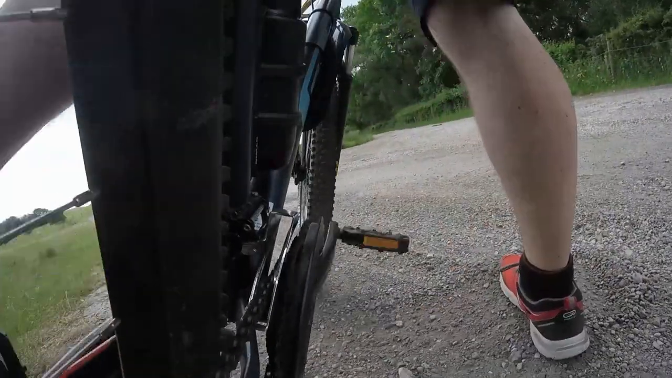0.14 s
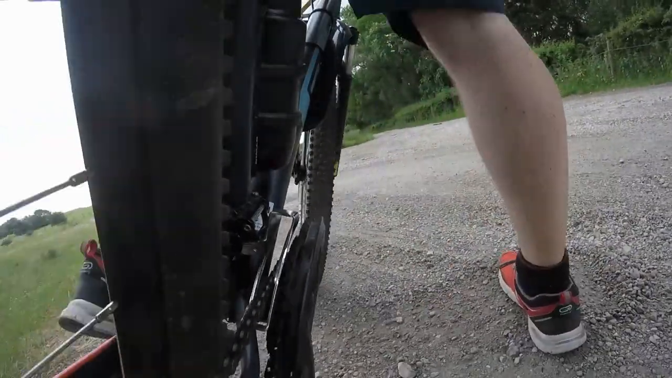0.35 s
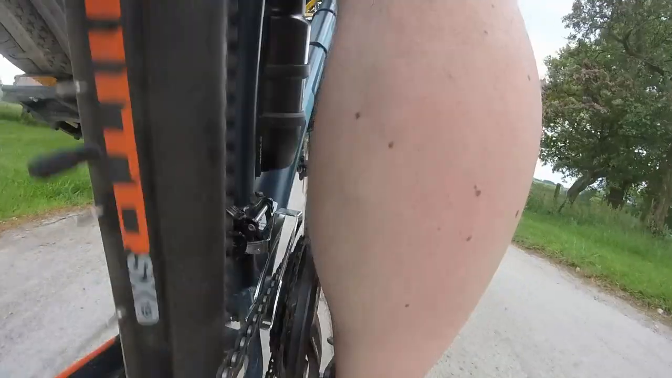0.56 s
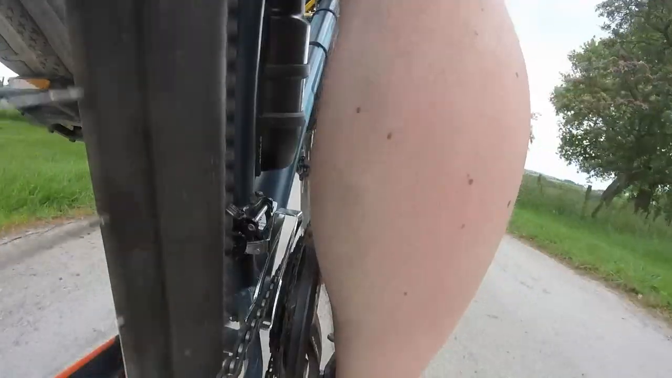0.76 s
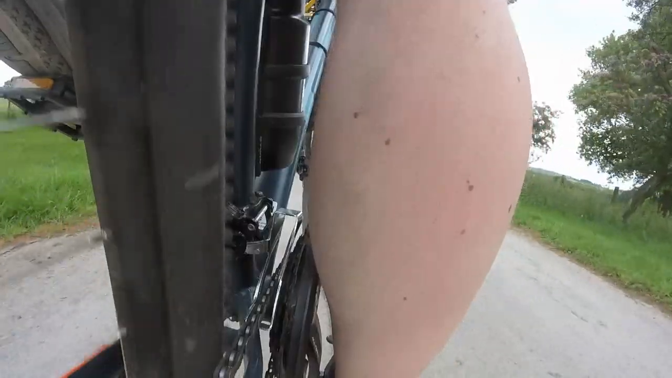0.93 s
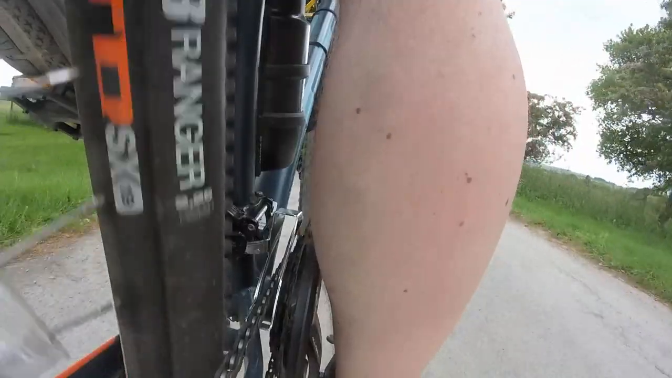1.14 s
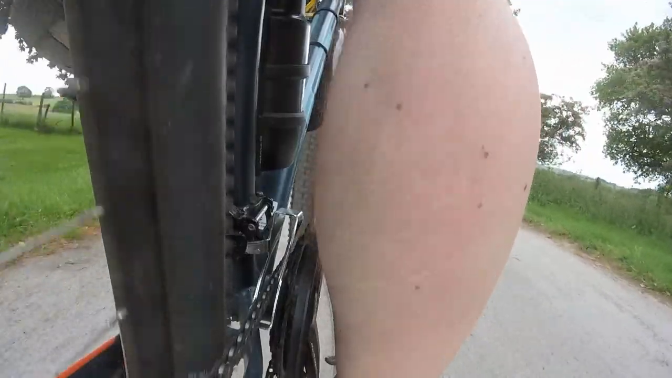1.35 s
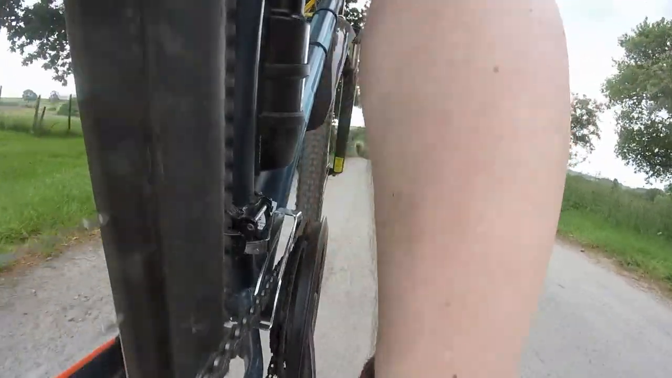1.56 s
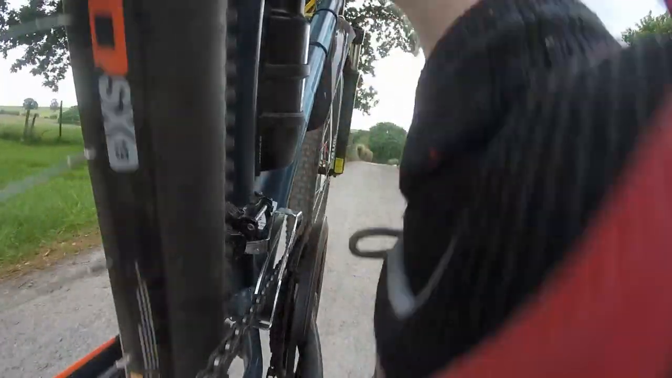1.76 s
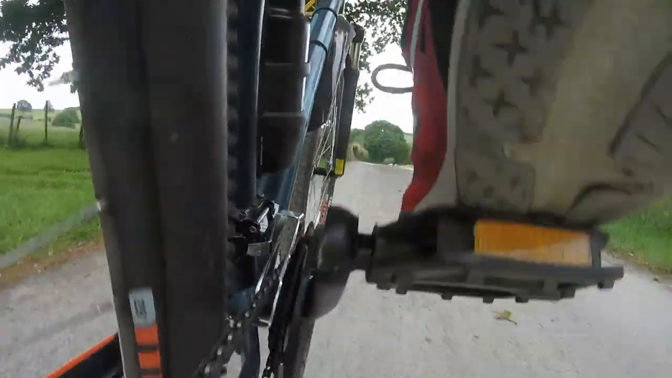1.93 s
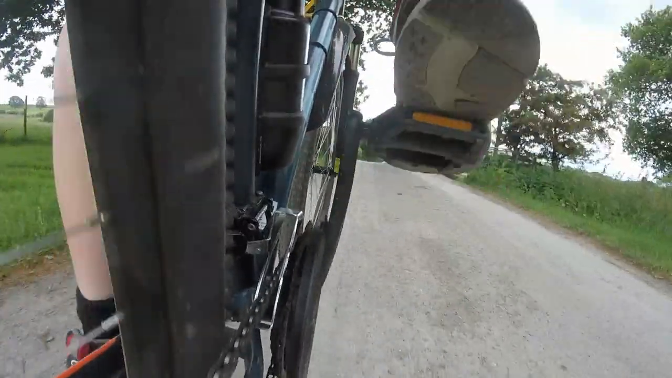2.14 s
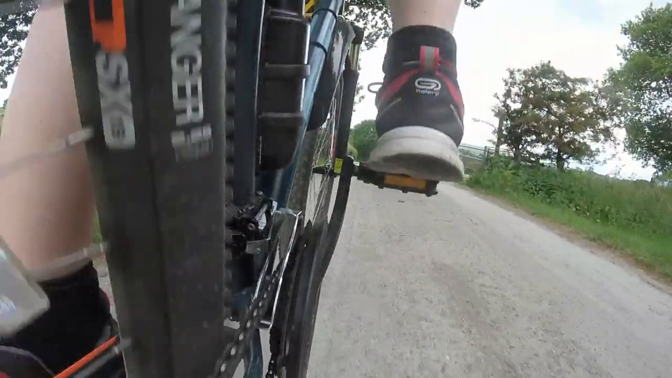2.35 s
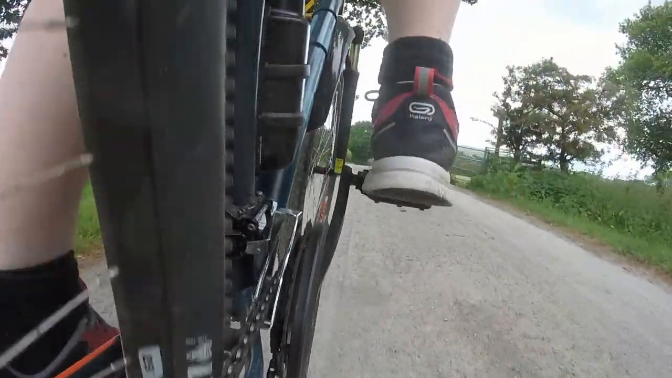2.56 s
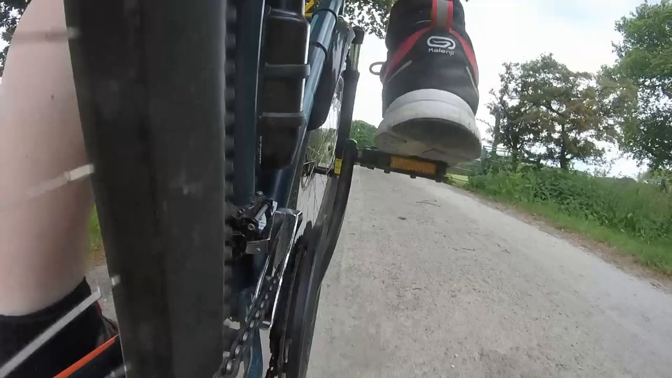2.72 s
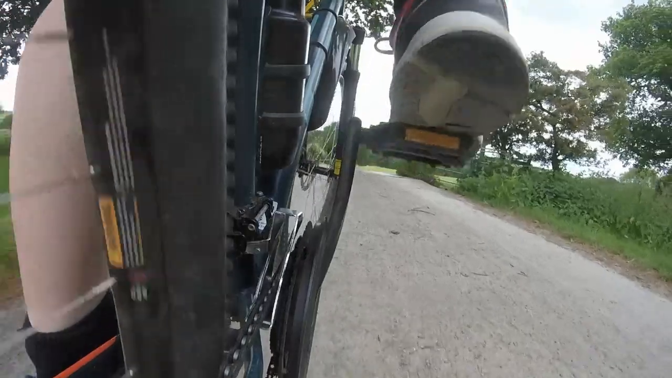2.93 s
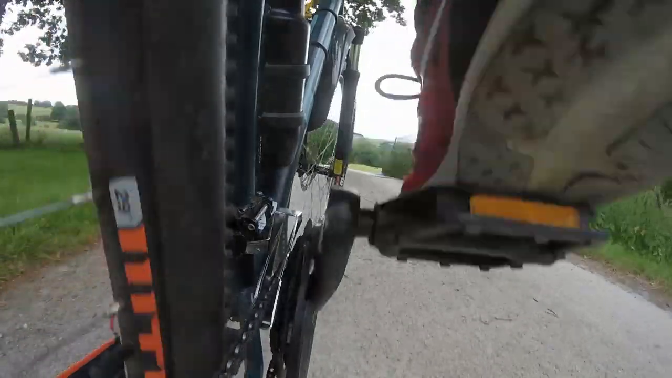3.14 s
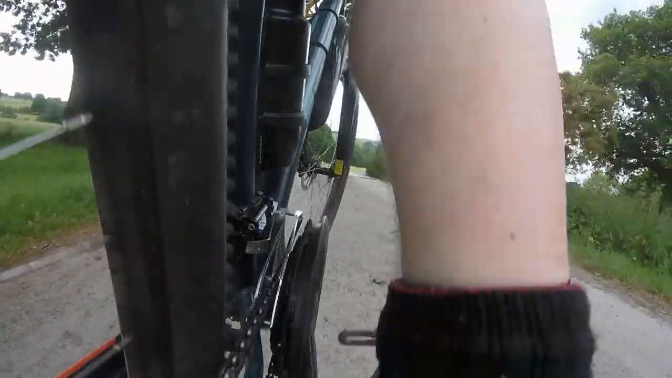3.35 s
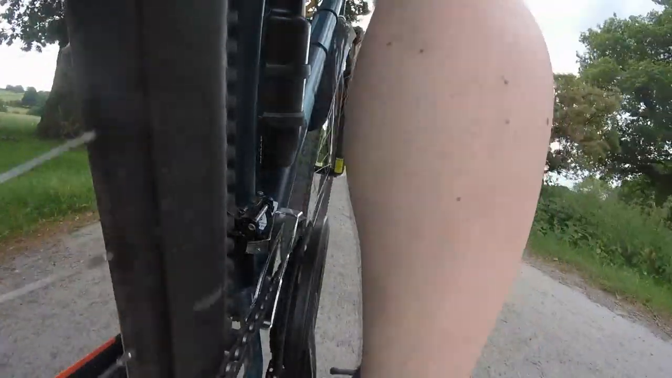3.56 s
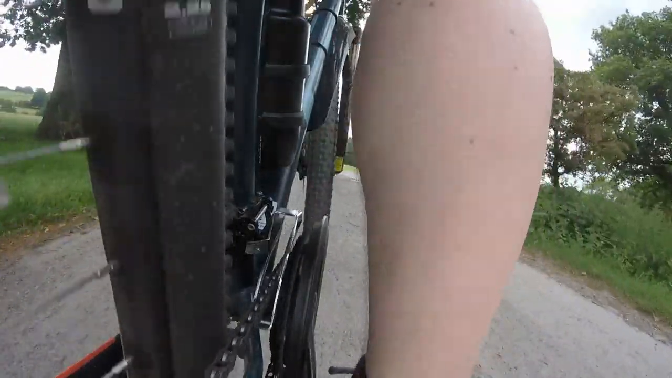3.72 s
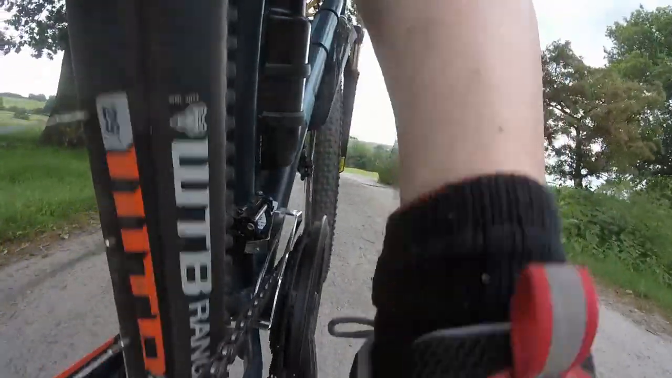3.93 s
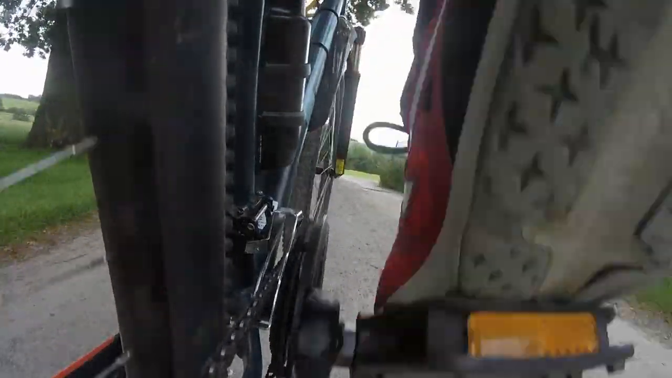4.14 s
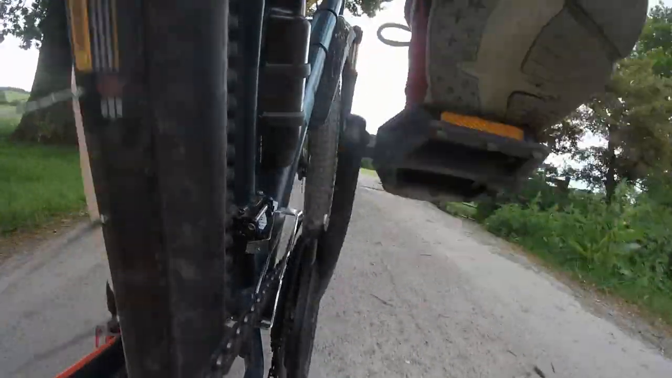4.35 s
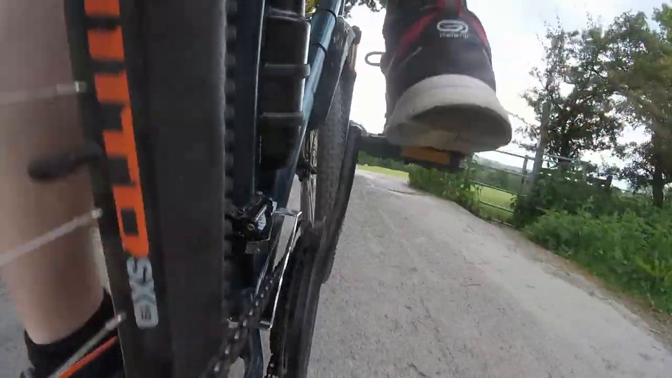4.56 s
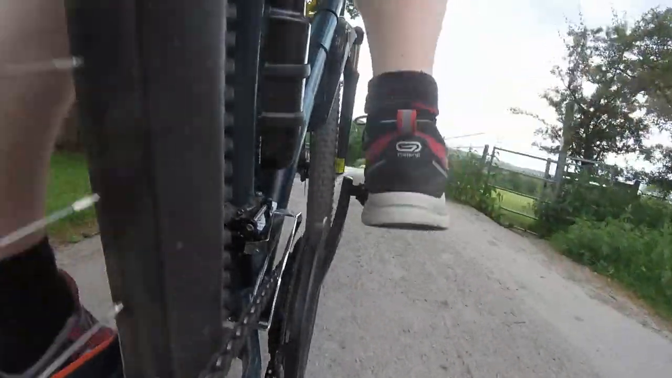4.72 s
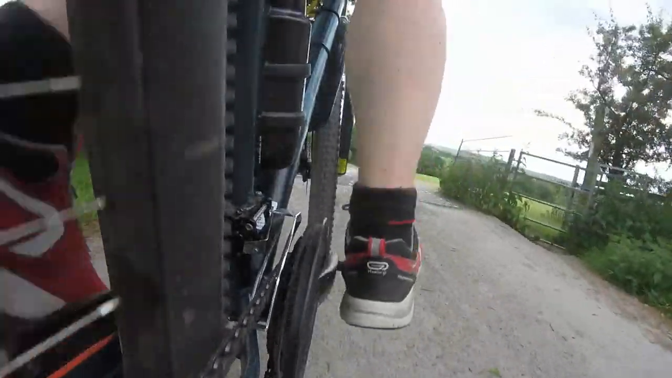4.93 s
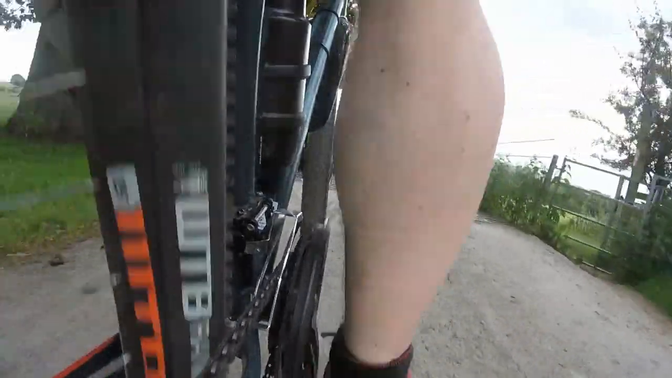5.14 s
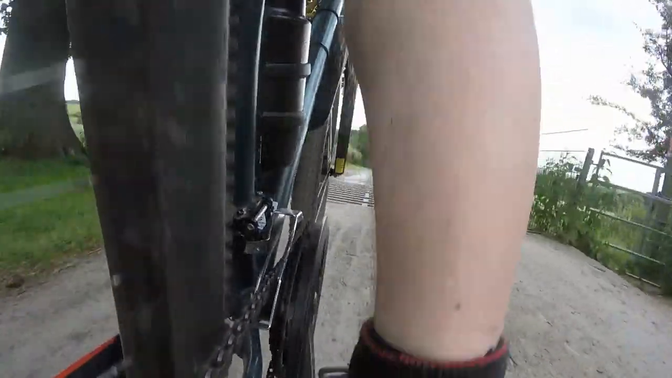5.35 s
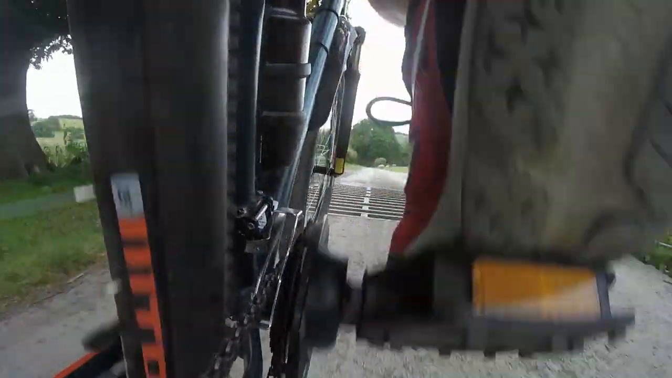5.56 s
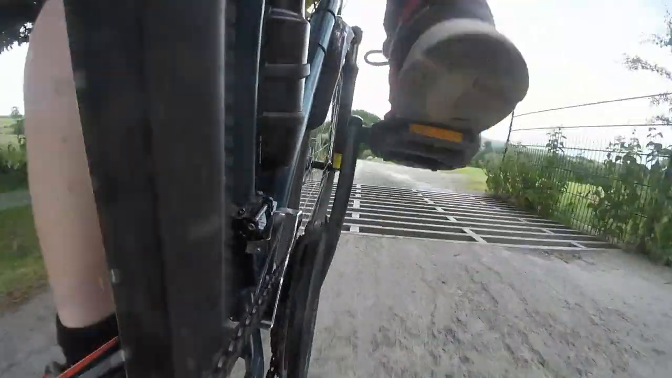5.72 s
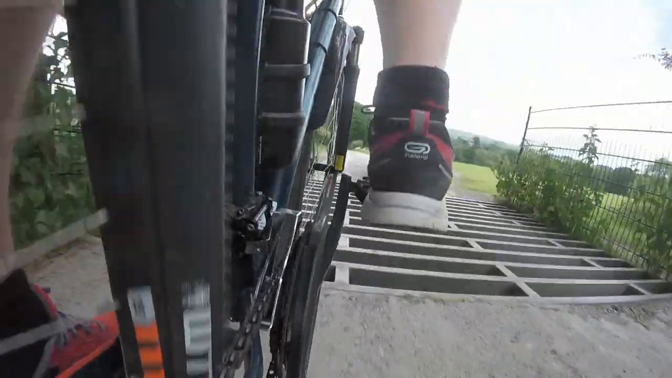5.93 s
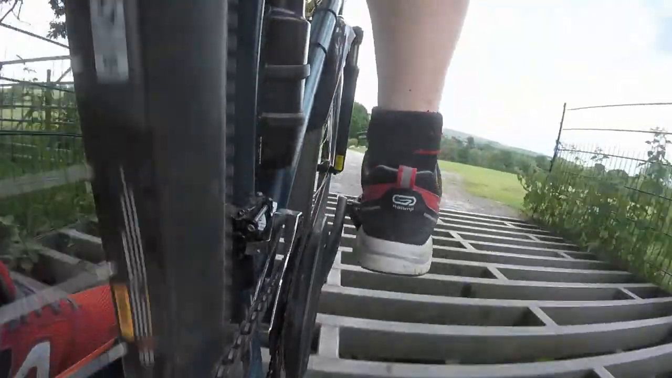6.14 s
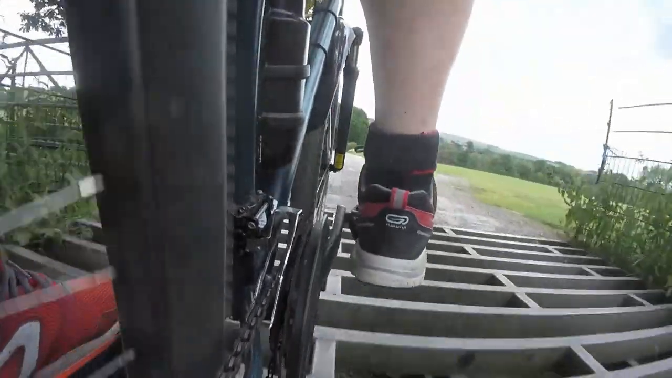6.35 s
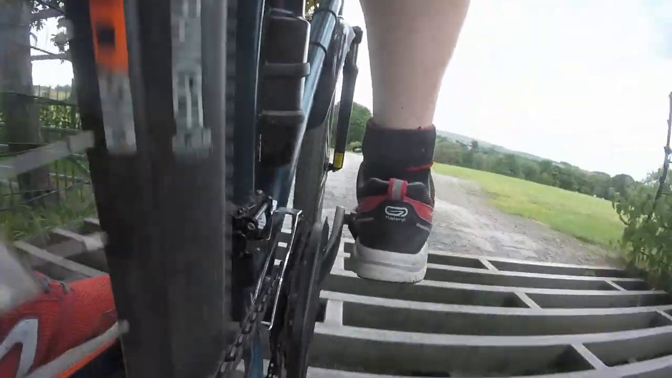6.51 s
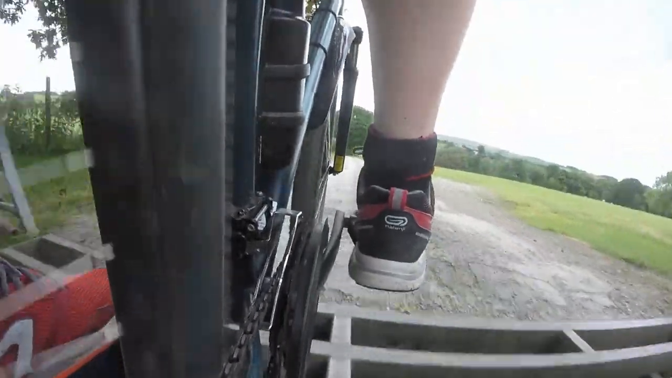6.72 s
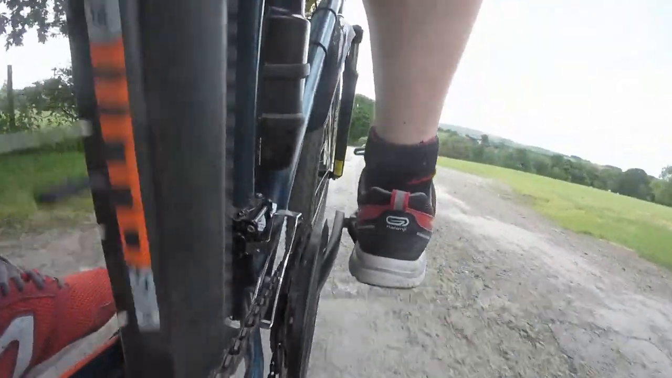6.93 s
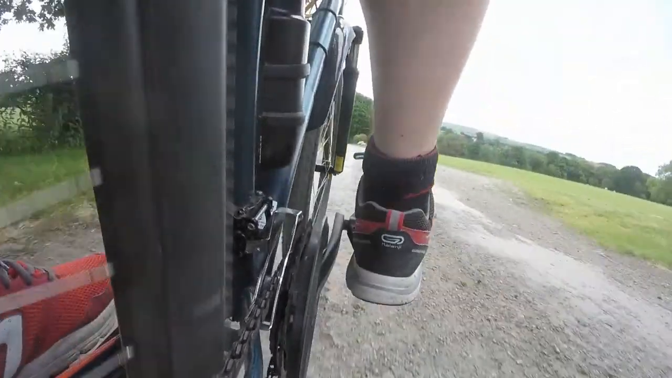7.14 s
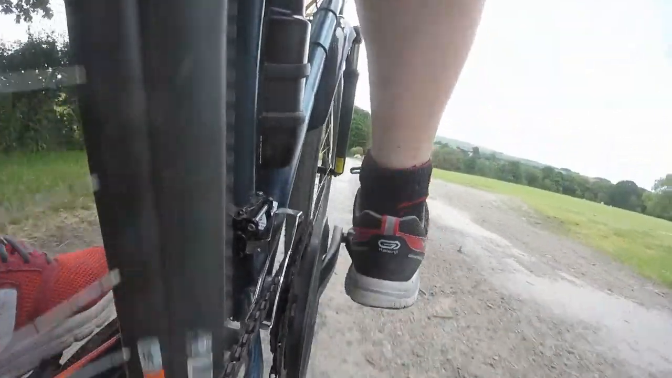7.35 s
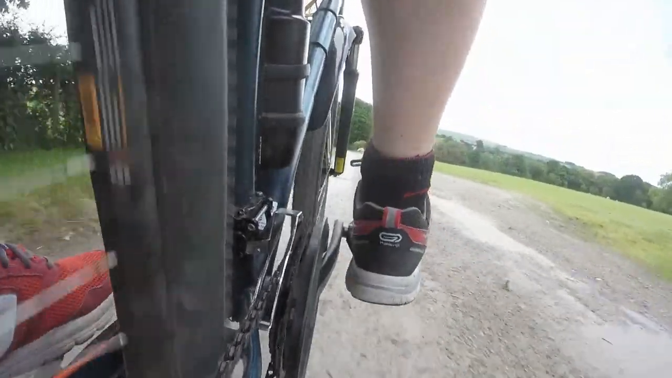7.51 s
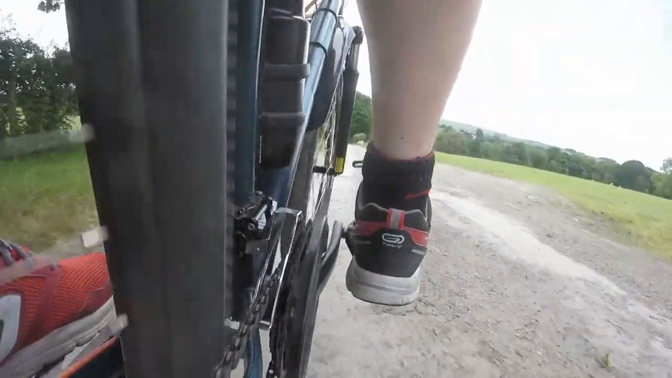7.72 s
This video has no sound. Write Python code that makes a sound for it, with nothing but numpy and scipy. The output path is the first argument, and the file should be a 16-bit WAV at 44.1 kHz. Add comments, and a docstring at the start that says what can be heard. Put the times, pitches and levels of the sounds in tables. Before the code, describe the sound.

After a few light knocks, bicycle tyres start humming and crackling over gravel outdoors, while air and bumps rumble the microphone mounted on the bike. Two spells of freewheel ticking are each followed by gear shifts that clunk and ring the frame. The ride then grows rougher and louder, with a cattle grid shaking the frame and the chain slapping and jangling to the end.

```python
"""A gravel path, heard from low on the frame of a mountain bike as it sets off.
The tyres hum as their tread drums the ground, and stones crunch under them. Freewheel pawls tick,
and the gears shift with clunks that ring the frame and a run of chain clicks. Near the end the bike
crosses a cattle grid: the frame drums and the slack chain rattles on over rough ground.
Underneath, air and uneven ground rock the microphone mount into a low rumble."""
import sys
import numpy as np
from scipy import signal
from scipy.io import wavfile

SR = 44100
rng = np.random.default_rng(int(sys.argv[2]) if len(sys.argv) > 2 else 0)


def int16_out(signal):
    """Quantize to a 16-bit WAV file."""
    q = np.round(np.clip(np.atleast_2d(signal).T, -1, 1) * 32767)
    wavfile.write(sys.argv[1], SR, q.astype(np.int16))


N = 343098
TIME = np.arange(N) / SR


# how hard the ground works the tyres: (time [s], hum level [dB], frame shaking [dB])
GROUND = [(0.33, -76, -77.5), (0.62, -57.5, -67.5), (1.3, -59.5, -70), (2.1, -59.5, -64),
          (2.75, -57.5, -69), (3.1, -59, -68), (3.87, -65, -71.5), (4.2, -58, -62.5), (4.65, -60, -63.5),
          (5.25, -47.5, -53), (5.47, -59, -58), (5.75, -49, -52), (5.9, -53.5, -58.5), (6.05, -53, -58),
          (6.09, -47, -54), (6.52, -42, -52), (6.95, -43, -51.5), (7.35, -49.5, -57), (7.78, -49.5, -55)]
# ruts and the grid's edge squash the tyres, which drum harder: (centre [s], half length [s], level [dB])
RUTS = [(0.71, 0.018, -61), (2.06, 0.042, -52), (3.97, 0.019, -52), (4.79, 0.017, -48.5),
        (5.09, 0.019, -45.5), (5.3, 0.039, -47), (6.1, 0.038, -44.5), (6.5, 0.04, -38.5)]
# the loaded chain grinds and shakes the frame: (centre [s], half length [s], level [dB])
CHAIN_GRINDS = [(0.38, 0.046, -62.5), (1.75, 0.16, -60), (3.5, 0.14, -58.5)]
# low hum of the casing: (frequency [Hz], level [dB])
TYRE_EQ = [(70, -27), (130, -5.5), (175, -1), (205, 2), (250, -3), (320, -4.5), (420, -15), (700, -20),
           (1600, -82)]
# hollow midrange of the shaken frame: (frequency [Hz], level [dB])
FRAME_EQ = [(200, -24.5), (400, 2), (520, -2.5), (690, 5), (770, -1.5), (860, 4), (1000, 3.5), (1110, -6.5),
            (1250, 0.5), (1450, -19), (1630, -8.5), (1900, -35.5), (4000, -48.5)]

def tyres(hum_db=-.5, rut_to_frame_db=-12.5, lumpy_db=2, uneven_db=1.5):
    """Tread blocks patter on the ground, drumming the casing; they and the chain shake the frame."""
    lumps = amp(lumpy_db * wander(per_s=60))
    patter = impacts(per_s=900, spread_db=2) * lumps * amp(uneven_db * wander(per_s=18))
    hum = evened(colour(patter, TYRE_EQ))
    shaking = evened(colour(impacts(per_s=1400, spread_db=3) * lumps, FRAME_EQ))
    ruts = swells(RUTS)
    hum_gain = np.hypot(follow(GROUND, column=1), ruts)
    ground_force = np.hypot(follow(GROUND, column=2), amp(rut_to_frame_db) * ruts)
    frame_gain = np.hypot(ground_force, swells(CHAIN_GRINDS))
    return amp(hum_db) * hum_gain * hum + frame_gain * shaking


# patches of looser gravel: (centre [s], half length [s], level [dB])
LOOSE_PATCHES = [(0.78, 0.059, -74.5), (2.05, 0.057, -71.5), (3.57, 0.1, -74), (4.65, 0.059, -71),
                 (5.27, 0.08, -66), (6.49, 0.036, -59.5), (6.89, 0.023, -58), (7.56, 0.07, -58.5)]
# featured stone snaps: (time [s], level [dB])
STONE_SNAPS = [(0.5957, -55.5), (0.7237, -59), (1.0692, -60.5), (1.2008, -58.5), (1.3508, -58),
               (1.428, -60), (4.159, -57), (4.258, -57), (4.339, -57), (4.6558, -50.5), (4.8359, -54.5),
               (4.9263, -50), (5.103, -54.5), (5.197, -47.5), (6.009, -53)]
# crunch of stones: (frequency [Hz], level [dB])
GRAVEL_EQ = [(500, -27.5), (1200, -1), (1800, -1.5), (2150, 0), (2700, -3), (3450, 1.5), (4100, -9),
             (4600, -8.5), (5600, -15.5), (7000, -12), (8800, -12.5), (11000, -24), (13000, -29),
             (16000, -10.5)]
# sharp grit spitting from the tread: (frequency [Hz], level [dB])
GRIT_EQ = [(1500, -18), (3300, 3.5), (5400, -4.5), (7000, 0), (8800, -13), (11500, -5.5), (13500, -17),
           (16000, -31)]

def gravel(dust_db=-5, stones_db=-1, grit_db=-9, snaps_db=4, clump_db=3):
    """Fine dust hisses under the tyres, stones crack and sharp grit spits."""
    t = np.arange(512) / SR
    clumps = amp(clump_db * wander(per_s=30))
    stones = impacts(per_s=600, spread_db=5) * clumps
    grit = impacts(per_s=160, spread_db=4.5) * clumps
    crunch = amp(dust_db) * evened(colour(rng.standard_normal(N), GRAVEL_EQ))
    crunch += amp(stones_db) * evened(colour(stones, GRAVEL_EQ))
    spit = rng.standard_normal(N) * signal.oaconvolve(abs(grit), np.exp(-t / 0.0016))[:N]
    crunch += amp(grit_db) * evened(colour(spit, GRIT_EQ))
    roughness = follow(GROUND, column=2) / amp(-70.5)  # frame shaking relative to smooth path
    bed_gain = amp(-81) * roughness ** 0.7
    out = np.hypot(bed_gain, swells(LOOSE_PATCHES)) * crunch
    strays = [(s, np.interp(s, TIME, bed_gain) * amp(15 + 2 * chance))  # these poke out of the bed
              for s, chance in scattered(start=0.66, end=6.0, per_s=3)]
    for s, gain in [(s, amp(db)) for s, db in STONE_SNAPS] + strays:
        add(out, s, gain * amp(snaps_db) * click(t, GRAVEL_EQ, rise=.0001, decay=.0032))
    # a low-pass at 12.5 kHz takes the high hiss off the gravel
    return signal.sosfilt(signal.butter(4, 12500, fs=SR, output='sos'), out)


# gear clunks, shoe and pedal knocks, stones:
# (time [s], level [dB], brightness [Hz], chatter length [s], ring time [factor])
KNOCKS = [(0.019, -61, 1420, 0.0067, 0.87), (0.149, -59, 710, 0.026, 0.63),
          (0.726, -55.5, 1060, 0.013, 1.5), (0.815, -58, 1950, 0.0041, 0.58),
          (1.628, -42.5, 885, 0.0071, 0.23), (1.631, -39.5, 1230, 0.0052, 0.7),
          (1.634, -33, 630, 0.0039, 0.76), (1.762, -52.5, 4700, 0.0012, 0.77),
          (1.7627, -46.5, 2160, 0.0033, 1.1), (1.763, -38.5, 1220, 0.012, 1.2),
          (1.836, -44.5, 2070, 0.00035, 0.75), (2.67, -48, 1250, 0.0047, 2.3),
          (3.02, -58.5, 2300, 0.0008, 0.91), (3.525, -58, 2660, 0.0025, 0.68),
          (3.617, -62, 1840, 0.0057, 0.26), (3.677, -59.5, 2430, 0.0015, 0.61),
          (3.943, -36, 774, 0.0051, 1), (3.946, -42.5, 1690, 0.0049, 2.3),
          (3.9486, -35.5, 1040, 0.0031, 0.41), (4.235, -53, 1990, 0.012, 0.33),
          (4.361, -51.5, 1470, 0.012, 0.81), (4.768, -54.5, 1860, .0025, 0.31),
          (4.79, -48, 1740, 0.011, .3), (4.904, -47.5, 915, 0.0084, 0.92), (5.063, -50.5, 810, .0077, 0.81),
          (5.227, -54.5, 1540, 0.0034, .7), (5.264, -50, 1200, 0.011, 0.97),
          (5.347, -50.5, 2510, 0.0049, 0.22), (5.625, -49.5, 905, 0.0054, 0.85),
          (5.711, -53.5, 825, .007, 0.79), (6.076, -46.5, 970, 0.015, .9), (6.48, -44, 1210, 0.013, 0.13),
          (6.856, -42, 804, .01, 0.81), (6.879, -42.5, 1690, 0.013, 0.22), (6.911, -44, 674, 0.0046, 1),
          (7.041, -48, 740, 0.0071, 1), (7.215, -55, 902, .003, 1.6), (7.463, -48.5, 1740, 0.027, 0.24),
          (7.505, -53, 2470, 0.0028, 0.42)]
# ring of the frame: (frequency [Hz], level [dB], t60 [s])
FRAME_MODES = [(210, 30, 0.16), (296, -39, 0.048), (412, -31, 0.027), (669, -6, 0.19), (721, 4, 0.081),
               (832.5, 3, 0.082), (960, 8, 0.04), (1151, 0.5, 0.054), (1220, 5, 0.029), (1588, -4.5, 0.026),
               (2096, -0.5, 0.012), (2300, -2.5, 0.007), (2930, -1.5, 0.018), (3250, -6.5, 0.031),
               (4570, -11, 0.037), (5120, -36, 0.02), (6980, -14, 0.027)]

def knocks(width=0.088, rebound=0.11, crack_db=-21, tail_db=-20, tail_t60=0.27):
    """A blow and its chatter ring the frame; harder contacts reach higher modes."""
    out, t = np.zeros(N), np.arange(8192) / SR
    for s, db, brightness, length, ring_factor in KNOCKS:
        modes = []
        for hz, level, t60 in FRAME_MODES:
            octaves = abs(np.log2(hz / brightness))
            rolloff_db = 6 * octaves ** 2 / (width + 0.17 * octaves)
            modes.append((hz, level - rolloff_db, t60 * ring_factor))
        chatter = rng.standard_normal(len(t)) * np.exp(-(t / length) ** 2)
        blow = rebound * chatter
        blow[0] += 1  # the first contact
        buzz = rng.standard_normal(len(t)) * amp(-60 * t / tail_t60)  # fittings buzz on after the blow
        blow += amp(tail_db) * buzz / np.linalg.norm(buzz)
        body = signal.fftconvolve(blow, ring(modes, t))[:len(t)]
        body /= np.std(body[t < max(.01, length)])  # the attack sets the level
        crack = amp(crack_db) * peaked(colour(chatter, GRAVEL_EQ))
        add(out, s, amp(db) * (body + crack))
    return out


# single links snapping onto the teeth: (time [s], level [dB])
LINK_SNAPS = [(1.6325, -64), (1.642, -51), (1.66, -55), (1.7055, -59), (2.0523, -45.5), (3.9484, -51),
              (3.9574, -61), (4.0014, -61), (4.3593, -53), (5.23, -44)]
# after the shift the chain seats link by link, then on every second link: (time [s], click gap [s])
SEATING_PACE = [(2.0245, .0265), (2.215, .0265), (2.235, .048), (2.49, .051)]
# a link seating on a sprocket: (frequency [Hz], level [dB])
SPROCKET_EQ = [(700, -19), (2100, 2), (3000, 3), (4100, 4.5), (5100, -2.5), (5550, -7), (7200, 2),
               (8400, 3.5), (10400, -5), (11100, -12), (12900, -17), (15500, -47)]
# featured slaps of the chain on its guide: (time [s], level [dB])
CHAIN_SLAPS = [(5.2788, -41), (5.3223, -48), (5.515, -47.5), (5.9732, -49.5), (6.333, -53), (6.3805, -49),
               (6.438, -47), (6.4973, -47), (6.546, -45), (6.5876, -50.5), (6.687, -54), (6.822, -47),
               (6.9286, -51), (7.0292, -50), (7.1377, -54), (7.2822, -49), (7.474, -49), (7.7172, -46)]
# the bars of the cattle grid jolt the chain in step: (time [s], bar gap [s])
GRID_PACE = [(6.1285, .0595), (6.43, .0545)]
# how hard the slack chain is shaken: (time [s], level [dB])
CHAIN_SHAKE = [(5.9, -68), (6.1, -74), (6.4, -65), (6.85, -62.5), (7.08, -61.5), (7.28, -65), (7.45, -70.5),
               (7.679, -62), (7.78, -61)]
# bright jangle of the chain: (frequency [Hz], level [dB])
CHAIN_EQ = [(700, -9), (2000, 4), (3800, 3.5), (4800, 1), (5600, -5), (7200, 0.5), (8600, 6), (10200, -1.5),
            (11200, -10.5), (13000, -11.5), (15500, -50)]

def chain(links_db=6, slaps_db=4, rattle_db=-2, rattle_per_s=85, hold_s=0.071, fade_db_per_s=50):
    """Links click on the sprockets; the grid and rough ground make the slack run slap and rattle."""
    out, rattle, t = np.zeros(N), np.zeros(N), np.arange(1024) / SR
    fade_from = SEATING_PACE[0][0] + hold_s
    seating = [(s, -49 - fade_db_per_s * max(s - fade_from, 0)) for s in paced(SEATING_PACE)]
    for s, db in LINK_SNAPS + seating:
        add(out, s, amp(db + links_db) * click(t, SPROCKET_EQ, rise=.000073, decay=.002))
    jolts = [(s, -46.5) for s in paced(GRID_PACE)]
    # past the first bars the chain slaps at random
    strays = [(s, -54.5 + 3.5 * chance) for s, chance in scattered(GRID_PACE[-1][0], TIME[-1], per_s=17)]
    for s, db in CHAIN_SLAPS + jolts + strays:
        add(out, s, amp(db + slaps_db) * click(t, CHAIN_EQ, rise=.0004, decay=.0016))
    shake_from, shake_until = CHAIN_SHAKE[0][0], CHAIN_SHAKE[-1][0]
    swings = np.arange(shake_from, shake_until, 1 / rattle_per_s)
    for s, (late, force) in zip(swings, rng.random((len(swings), 2))):
        add(rattle, s + late / rattle_per_s, force ** 2 * tick(t, rise=.001, decay=.003))
    rattle = colour(rattle, CHAIN_EQ)
    rattle /= np.std(rattle[TIME > shake_from])
    return out + amp(rattle_db) * follow(CHAIN_SHAKE, column=1) * rattle


# two spells of coasting, one lazy and one quick: (time [s], tick gap [s])
SLOW_COAST = [(0.542, .0793), (1.4, .0927)]
QUICK_COAST = [(2.632, .072), (2.7, .0588), (3.035, .0588), (3.17, .043), (3.28, .0341), (3.525, .0341),
               (3.555, .0385), (3.64, .043), (3.675, .072), (3.76, .072)]
# lone pawl ticks as the pedal is set: (time [s], level [dB])
PEDAL_TICKS = [(0.157, -54.5), (0.342, -63.5), (0.401, -64.5)]
# crisp snap of a pawl: (frequency [Hz], level [dB])
PAWL_EQ = [(1000, 2.5), (3000, -5), (5400, -11), (7000, -1.5), (9000, -1), (11800, -5), (13600, -20),
           (14700, -9), (16000, -66)]
# ring of the hub: (frequency [Hz], level [dB], t60 [s])
HUB_MODES = [(7300, -14, .02), (8900, -4, 0.035), (9900, -15, 0.04), (11700, -19, .025), (14300, -41, .025)]

def freewheel(level_db=5, ring_db=-25, spread_db=2):
    """Each pawl drops into its notch and rings the hub, a little differently every time."""
    out, t = np.zeros(N), np.arange(2048) / SR
    times = paced(SLOW_COAST) + paced(QUICK_COAST)
    coasting = [(s, -59.5 + spread_db * rng.standard_normal()) for s in times]
    for s, db in PEDAL_TICKS + coasting:
        modes = [(hz, level + 4 * rng.standard_normal(), t60) for hz, level, t60 in HUB_MODES]
        pawl = click(t, PAWL_EQ, rise=.0001, decay=.0026)
        add(out, s, amp(db + level_db) * (pawl + amp(ring_db) * peaked(ring(modes, t))))
    return out


# thumps of the wheels dropping over bumps, and of the rider mounting the bike at the start (row at 0.15 s):
# (time [s], level [dB], pitch [Hz], t60 [s])
BUMPS = [(0.15, -55.5, 190, 0.17), (0.946, -41, 65, 0.04), (1.06, -38, 55, 0.037),
         (1.358, -41.5, 111, 0.045), (2, -32.5, 43, 0.16), (2.055, -35, 75, 0.065),
         (2.749, -33.5, 42.5, 0.14), (2.944, -44, 170, .04), (4.33, -43, 75, 0.042),
         (4.48, -38, 44.7, 0.086), (4.699, -37, 79.5, 0.038), (4.79, -46, 110, 0.024),
         (4.961, -32, 54, 0.054), (5.075, -36.5, 75, 0.15), (6.076, -40, 110, 0.044),
         (6.480, -29.5, 174, 0.1), (6.609, -39, 218, 0.021), (7.132, -31.5, 206, 0.022)]

def bumps(level_db=-1):
    """The wheel bounces on its tyre for a few swings."""
    out, t = np.zeros(N), np.arange(SR // 3) / SR
    for s, db, hz, t60 in BUMPS:
        attack = 1 - np.exp(-t * hz * 2)
        add(out, s, amp(db + level_db) * peaked(ring([(hz, 0, t60)], t) * attack))
    return out


# the chain dragging across the sprockets, and a shoe scuffing at the start (row at 0.328 s): (time [s], level
# [dB], length [s], screech share [0-1])
SCRAPES = [(0.328, -83, 0.11, 0.26), (1.621, -60, 0.035, 0), (1.982, -46, 0.025, 0.9),
           (1.995, -59, 0.027, 0.4), (3.937, -65, 0.063, 0), (5.258, -65, 0.035, 0),
           (6.876, -52, 0.016, 0.1)]
# screech of steel on steel: (frequency [Hz], level [dB])
SCREECH_EQ = [(800, 8.5), (3400, -4), (5600, -3.5), (7500, 2.5), (9500, 2), (11500, -6), (13000, 6),
              (14400, -9), (16000, -8)]

def scrapes(rough_db=3):
    """The chain's side plates grind over the teeth; pressed hard, they screech. A shoe scuffs with the same
    rasp."""
    out = np.zeros(N)
    friction = rng.standard_normal(N) * amp(rough_db * wander(per_s=430))
    rasp, screech = evened(colour(friction, CHAIN_EQ)), evened(colour(friction, SCREECH_EQ))
    for s, db, length, share in SCRAPES:
        span = round(s * SR) + np.arange(round(length * SR))
        blend = (1 - share) * rasp[span] + share * screech[span]
        add(out, s, amp(db) * signal.windows.tukey(len(span), .3) * blend)
    return out


# a brake pad touches its disc: (time [s], length [s], level [dB], pitch [Hz], bandwidth [Hz])
BRAKE_CHIRPS = [(0.147, 0.03, -70.5, 6500, 780), (5.226, .014, -55, 6200, 500)]

def brake():
    """The pad slips briefly on its disc, which sings unsteadily."""
    out = np.zeros(N)
    for s, length, db, hz, width in BRAKE_CHIRPS:
        t = np.arange(0, length, 1 / SR)
        disc = np.exp(-np.pi * width * t) * np.sin(2 * np.pi * hz * t)
        chirp = signal.fftconvolve(rng.standard_normal(4096), disc)[:len(t)]
        add(out, s, amp(db) * evened(chirp) * signal.windows.tukey(len(t), .5))
    return out


# fader ride of the rumble on the mount: (time [s], level [dB])
RUMBLE_RIDE = [(0.54, -68), (0.61, -49.5), (1.05, -47.5), (1.5, -55), (2.05, -49), (2.45, -55.5),
               (2.78, -45), (3.0, -53), (3.9, -57.5), (4.35, -47), (4.7, -49.5), (5.08, -42.5), (5.3, -48),
               (5.68, -54), (5.77, -41.5), (5.94, -61.5), (6.12, -47), (6.85, -48), (7.35, -59), (7.7, -52)]
# deep weight of that rumble: (frequency [Hz], level [dB])
RUMBLE_EQ = [(12, -13), (25, -1), (40, 1), (70, -2), (110, -6), (180, -15), (400, -45.5), (900, -68)]

def buffeting(level_db=-1, gusty_db=2):
    """Air and uneven ground rock the microphone mount."""
    gusts = evened(amp(gusty_db * wander(per_s=14)))
    rumble = evened(colour(rng.standard_normal(N), RUMBLE_EQ))
    return amp(level_db) * follow(RUMBLE_RIDE, column=1) * gusts * rumble


def amp(db):
    """Decibels to gain."""
    return 10 ** (np.asarray(db) / 20)


def evened(x):
    """Scales to an rms of one."""
    return x / np.sqrt(np.mean(x ** 2) + 1e-20)


def peaked(x):
    """Scales to a peak of one."""
    return x / (abs(x).max() + 1e-20)


def follow(table, column):
    """One dB column of a fader ride as a gain for every sample."""
    rows = np.array(table)
    return amp(np.interp(TIME, rows[:, 0], rows[:, column]))


def swells(table):
    """Brief rises and falls of level as a gain for every sample."""
    return np.sqrt(sum(amp(db) ** 2 * np.exp(-((TIME - s) / half) ** 2) for s, half, db in table))


def add(mix, s, sound):
    """Mixes a sound in at s seconds."""
    part = mix[max(round(s * SR), 0):][:len(sound)]
    part += sound[:len(part)]


def colour(x, eq, size=4096):
    """Minimum-phase EQ, so clicks keep their sharp start."""
    hz, db = np.transpose(eq)
    bins = abs(np.fft.fftfreq(size, 1 / SR))
    log_gain = np.log(amp(np.interp(np.log(bins + 1), np.log(hz), db)))
    taps = np.fft.ifft(np.exp(np.conj(signal.hilbert(log_gain)))).real
    return signal.oaconvolve(x, taps[:size // 2])[:len(x)]


def wander(per_s):
    """Random drift around zero, gliding to per_s new values a second."""
    knots = rng.standard_normal(N // 16)
    return np.interp(TIME * per_s, np.arange(len(knots)), knots)


def impacts(per_s, spread_db):
    """Random impulses, most small and a few large."""
    size = amp(spread_db * np.minimum(rng.exponential(1, N), 4))
    return size * rng.choice([-1, 1], N) * (rng.random(N) < per_s / SR)


def ring(modes, t):
    """Sum of dying modes."""
    return sum(amp(db - 60 * t / t60) * np.sin(2 * np.pi * hz * t) for hz, db, t60 in modes)


def tick(t, rise, decay):
    """A tiny burst of contact noise; rise and decay in seconds."""
    return peaked(rng.standard_normal(len(t)) * (1 - np.exp(-t / rise)) * np.exp(-t / decay))


def click(t, eq, rise, decay):
    """A tick in the colour of the struck part, with a peak of one."""
    return peaked(colour(tick(t, rise, decay), eq))


def paced(curve):
    """Times of a run of clicks whose gap follows a curve."""
    at, gap = np.transpose(curve)
    times = [at[0]]
    while times[-1] <= at[-1]:
        times.append(times[-1] + np.interp(times[-1], at, gap))
    return times[:-1]


def scattered(start, end, per_s, size=200):
    """Unevenly spaced events: rows of a time and a chance number of unit spread."""
    late, chance = rng.random(size), rng.standard_normal(size)
    times = start + (np.arange(size) + late) / per_s
    return np.column_stack([times, chance])[times < end]


def scene():
    """Everything reaches one microphone on the frame."""
    rolling = buffeting() + tyres() + gravel()
    drivetrain = freewheel() + chain() + scrapes()
    return (rolling + drivetrain + brake() + knocks() + bumps())[None]


def record(dry):
    """A steep high cut at 15.6 kHz trims the very top."""
    high_cut = signal.firwin(255, 15600, window=("kaiser", 8), fs=SR)
    return signal.oaconvolve(dry, high_cut[None], "same")


dry = scene()
out = record(dry)
int16_out(out)
```